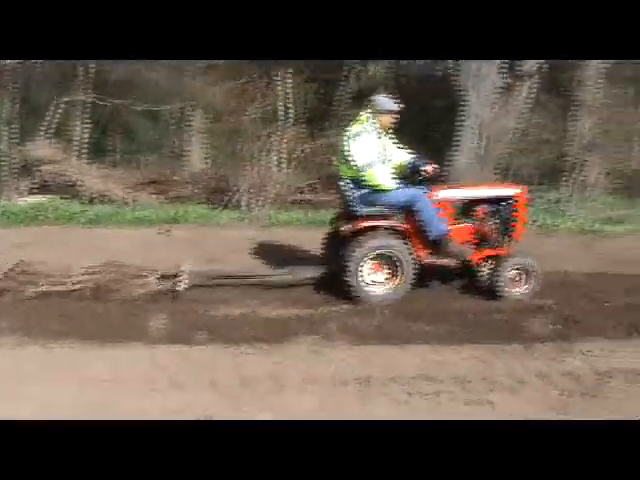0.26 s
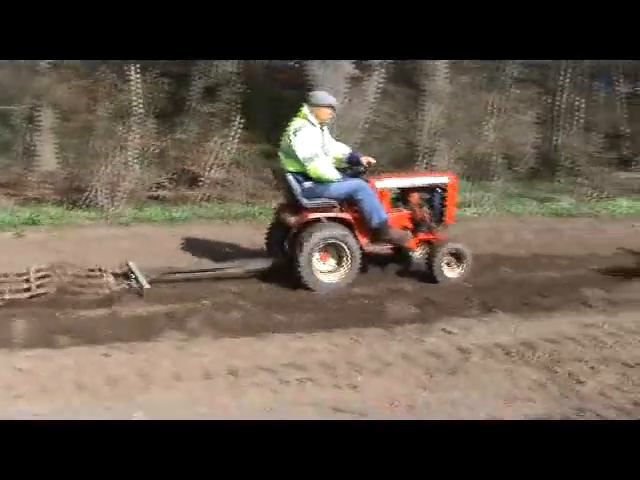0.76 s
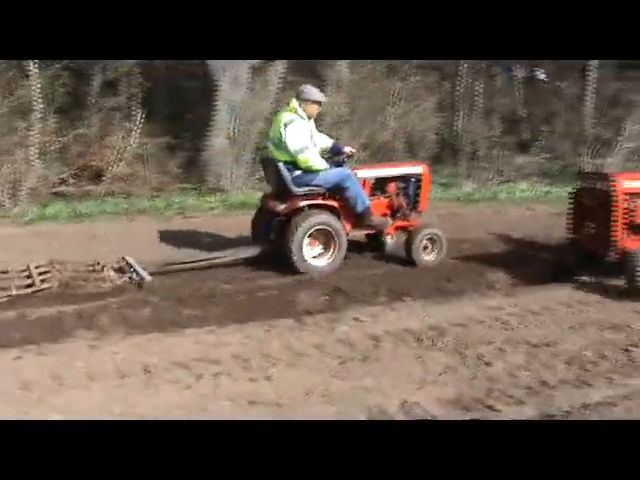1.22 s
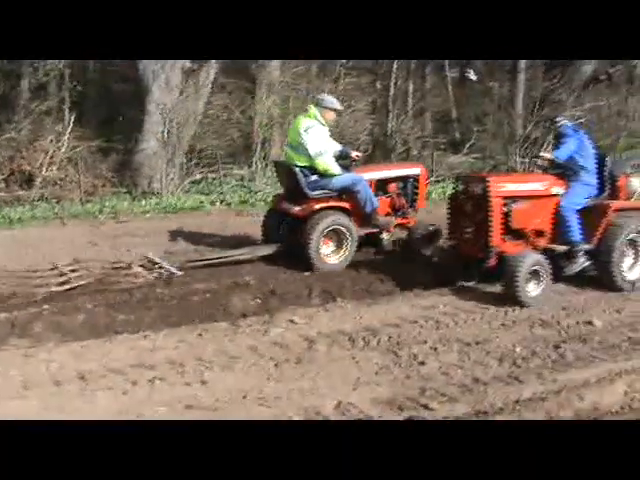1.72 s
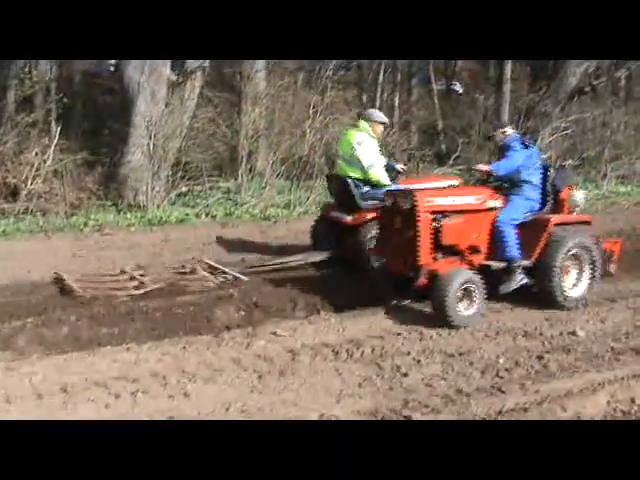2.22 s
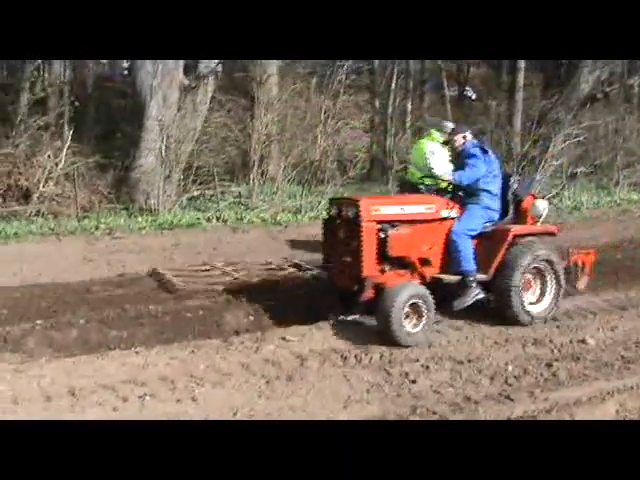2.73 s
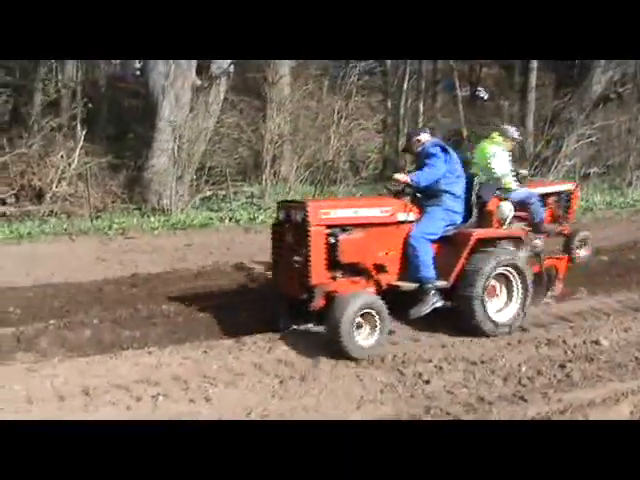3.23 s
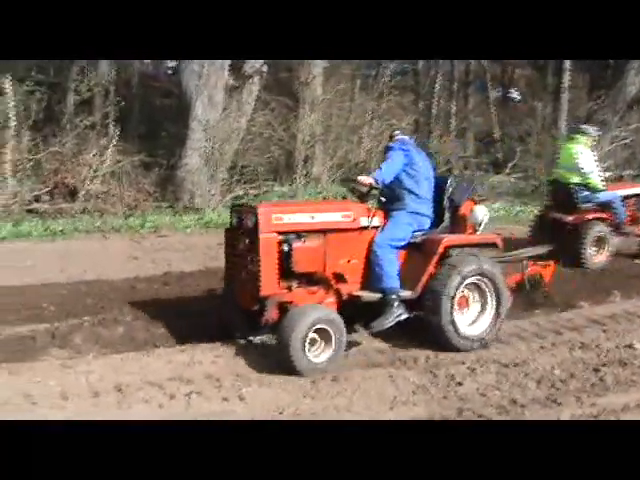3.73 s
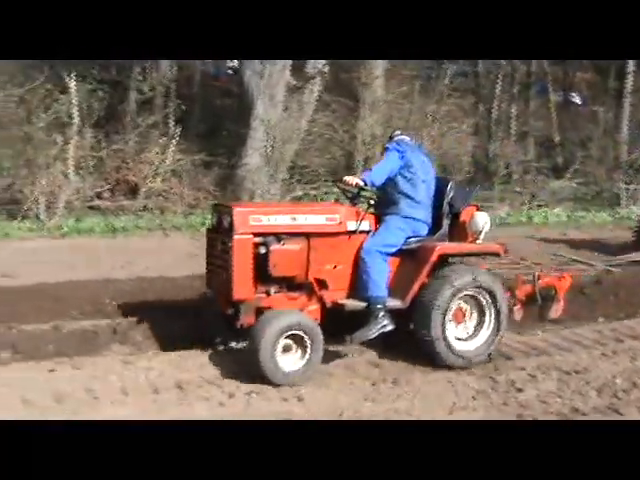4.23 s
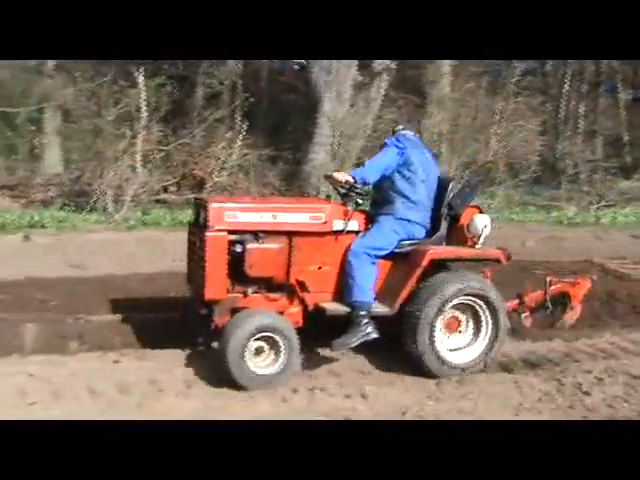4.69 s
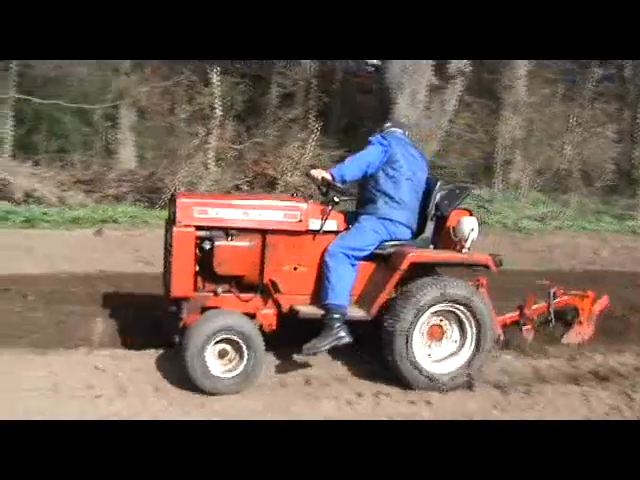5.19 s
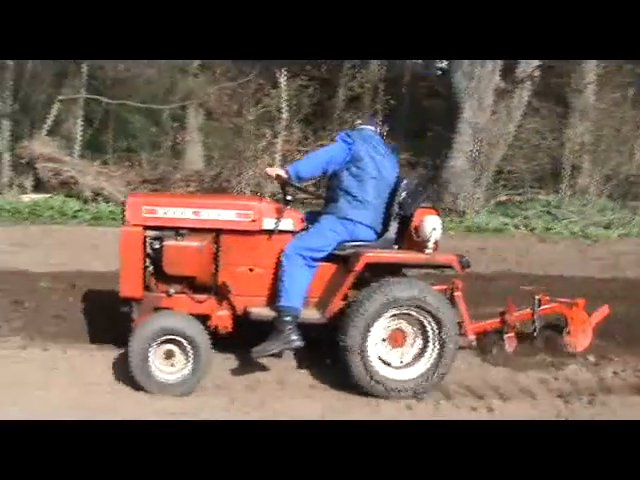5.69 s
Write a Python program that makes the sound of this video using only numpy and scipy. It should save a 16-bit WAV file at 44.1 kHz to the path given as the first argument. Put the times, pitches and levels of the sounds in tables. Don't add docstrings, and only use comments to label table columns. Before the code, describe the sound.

Loud low wind blasts open the scene and die away after about a second, uncovering two overlapping tractor engines with fast, even beats. A soft chuffing single-cylinder passes and recedes, dragging a faintly clinking harrow. A two-cylinder with uneven, hissing exhaust pops draws near and dominates from three seconds. Sheet metal rattles throughout; dry open-air stereo, slightly left, with wind rumble on the microphone.

```python
import sys
import numpy as np
from scipy import signal
from scipy.fft import rfft, irfft
from scipy.io import wavfile
from scipy.ndimage import uniform_filter1d

SR = 44100
rng = np.random.default_rng(int(sys.argv[2]) if len(sys.argv) > 2 else 0)


def boost_factor(decibels):
    exponent = np.asarray(decibels, float) / 20
    return 10 ** exponent


def transcribe(u):
    v = np.clip(np.atleast_2d(u).T, -1, 1)
    q = np.round(v * 32767).astype(np.int16)
    wavfile.write(sys.argv[1], SR, q)


N = 262395
HZ = np.arange(N // 2 + 1) * SR / N + 1e-3

# time_s, nearness_db
TWIN_PATH = [(0, -6.5), (1, -6.5), (1.5, -4), (2.4, -3), (2.75, -3.5), (2.97, -1.5), (3.25, -1.5),
             (3.6, -0.85), (4.5, 0.16), (5.4, 1.17), (5.95, 0.6)]
# time_s, nearness_db, screened_db
SINGLE_PATH = [
    (0, 1, 0.5),
    (1.3, 0.5, -2.5),
    (2.0, -1.5, 0),
    (2.7, -0.5, -14),
    (3.6, -3.5, 3.5),
    (5.95, -2.5, -9.5),
]
# time_s, extra_pop_db
RICH_FIRINGS = [
    (.39, -1),
    (2.84, -3.5),
    (3.0, 4),
    (4.38, 3),
    (4.79, -1.5),
    (5.03, -2),
    (5.36, -1.5),
    (5.44, 2.5),
    (5.52, -0.5),
    (5.685, 2.5),
]
# pitch_hz, width_hz, signed_share
TWIN_PIPE = [(76, 40, .75), (105, 51, 1.0), (192, 60, .55)]
SINGLE_PIPE = [(88, 88, .35), (130, 56, -1.0), (196, 60, .6), (245, 60, -.2)]
# pitch_hz, width_hz, level_db
POP_BANDS = [(950, 1160, -6), (1917, 87, 8.5), (3110, 1700, 11), (4880, 600, 8), (5570, 640, 5),
             (8300, 1470, 6), (9820, 1730, 5), (12600, 4500, -7), (14900, 2900, -31)]
CHUFF_BANDS = [(717, 360, -1), (1340, 660, -6), (2040, 220, -4.5), (3130, 650, -5.5), (5640, 2100, -9)]
# pitch_hz, width_hz, level_db
PANELS = [(740, 67, 4.5), (1003, 63, 4), (1483, 210, 4), (1980, 98, 1), (3170, 170, 1.5), (4480, 970, 3)]
# pitch_hz, level_db
CLATTER_COLOUR = [(40, -19), (120, 11), (250, -25), (380, -11), (600, -2.5), (1200, -8), (2500, -12),
                  (3700, -14), (4300, -22.5), (6400, -23.5), (7500, -29.5), (11000, -33), (12500, -39.5),
                  (15500, -57)]
# pitch_hz, t60_s
LINKS = [(6438, .06), (6926, .1), (9146, .1), (11561, .12)]
LINK_REST_DB = [-75, -76, -77.5, -80.5]
# middle_s, half_length_s, link_hz, above_rest_db
SHAKES = [(.7, .55, 11561, 7), (.9, .45, 6438, 6), (.8, .55, 9146, 6), (1.5, .2, 6926, 4),
          (1.9, .25, 11561, 8.5), (1.85, .3, 9146, 8.5), (4.3, .9, 11561, 7), (3.9, .75, 6926, 8),
          (3.9, .4, 9146, 5), (4.8, .5, 6438, 4), (5.4, .6, 9146, 10), (5.8, .2, 6438, 6),
          (5.7, .25, 11561, 6)]
# start_s, hold_s, buffet_db, extra_rumble_db
GUSTS = [(0, .2, -12, -16), (0.223, 0.29, -12.5, -10), (0.546, .15, -12.5, -17), (0.723, 0.048, -16.5, 1),
         (.895, .012, -27.5, 11.5), (1.164, 0.025, -33, .1), (1.278, 0.064, -35.5, 2),
         (2.135, 0.026, -40, 11), (2.274, 0.033, -36.5, 7), (2.418, 0.029, -34.5, 3), (2.8, 0.036, -39, 7),
         (3.238, 0.27, -33, 2), (3.905, 0.24, -35, 8), (4.378, 0.017, -29, -1), (4.539, 0.019, -26, 8),
         (4.712, .25, -22, 9), (5.136, 0.021, -28, -11), (5.912, .06, -20, 2)]
# time_s, level_db
BREEZE = [(0, -30), (.8, -31), (.86, -38), (1.05, -42), (1.6, -47), (2.05, -47), (2.55, -38), (3.1, -43),
          (3.8, -43), (4.1, -34), (4.68, -32), (5.3, -27), (5.37, -38), (5.42, -31), (5.78, -25.5),
          (5.9, -28)]
# pitch_hz, level_db
BUFFET_MID = [(15, -50), (30, -18), (55, -15), (90, 0.5), (175, 2), (300, -5), (525, -19.5), (800, -32),
              (1500, -43), (3000, -70), (5500, -120)]
BUFFET_SIDE = [(15, -45), (25, -15), (58, -12), (124, -5), (156, -1), (243, 0), (433, -5), (757, -16),
               (1460, -32), (2500, -42), (3250, -72), (5500, -120)]
# pitch_hz, level_db
RUMBLE = [(15, -28), (30, -10), (65, 0), (110, -5), (200, -18), (500, -45), (3000, -120)]

# firings at 0 s, firings per s, sag of that rate per s
TWIN_SPEED, SINGLE_SPEED = (.375, 24.567, 0), (-.86, 19.383, .0316)
TWIN_THUMP_DB, SINGLE_THUMP_DB = -37.7, -41.2
POP_DB, CHUFF_DB = -46, -49
TWIN_TIN_DB, SINGLE_TIN_DB = (-41.5, -47.5), (-47.5, -45.5)
TWIN_PAN_DB, SINGLE_PAN_DB = -2.5, -5
POP_BEAM, TIN_BEAM = 1.9, (1.6, 2.5)
WEAK_DB, WEAK_DROPS = -7.5, 1.5
GUST_RISE_DB_S, GUST_FALL_DB_S = 800, 380
DULL_HZ, DULL_SLOPE = 226, 0.19
EVENING = .6
RUMBLE_DB, RUMBLE_SLOPE = -8, -.42
WIND_PAN_DB, WIND_PAN_SLOPE = -1.5, -0.31


def twin(near_db):
    crank = crank_turns(*TWIN_SPEED)
    at, number = strokes(crank, shift=-.135, jitter=.0003)
    weak = number % 2
    strength_db = .9 * rng.standard_normal(200)[:len(at)]
    pulse = clicks(at, strength_db)
    sharp = clicks(at, -200 * weak) * pulse
    blunt = 1.15 * soften(np.roll(pulse - sharp, -10), .0008)
    gulp_at, _ = strokes(crank, shift=.356, jitter=.0006)
    low = thump(sharp + blunt - clicks(gulp_at, -13), TWIN_PIPE)

    pop_at = np.minimum(at + int(.0036 * SR), N - 1)
    rich_db = sum(db * (abs(pop_at / SR - s) < .018) for s, db in RICH_FIRINGS)
    weak_db = np.minimum(WEAK_DB - WEAK_DROPS * near_db, 0)
    level_db = strength_db + rich_db + weak * weak_db[at]
    pops = jet(pop_at, level_db, POP_BANDS, seconds=.0021, colour_db=2.2)
    valve_at = np.minimum(gulp_at + 200, N - 1)
    valve = boost_factor(-11) * jet(valve_at, 0, POP_BANDS, seconds=.004, colour_db=4)
    return boost_factor(TWIN_THUMP_DB + near_db) * low, boost_factor(POP_DB + POP_BEAM * near_db) * (pops + valve)


def single(far_db, screened_db):
    at, _ = strokes(crank_turns(*SINGLE_SPEED), shift=-.169, jitter=.0003)
    strength_db = 1.1 * rng.standard_normal(200)[:len(at)]
    pulse = clicks(at, strength_db)
    pulse = pulse - .56 * np.roll(pulse, int(.0148 * SR))
    chuff_at = np.minimum(at + int(.0055 * SR), N - 1)
    chuff = jet(chuff_at, strength_db, CHUFF_BANDS, seconds=.0033, colour_db=1.4)
    chuff_db = CHUFF_DB + 0.55 * far_db + 0.25 * screened_db
    return boost_factor(SINGLE_THUMP_DB + far_db) * thump(pulse, SINGLE_PIPE), boost_factor(chuff_db) * chuff


def crank_turns(start, rate, sag):
    t = np.arange(N) / SR
    return start + rate * t - sag * t ** 2 / 2


def strokes(crank, shift, jitter):
    late = crank - shift
    at = np.flatnonzero(np.diff(np.floor(late)) > 0)
    wobble = (jitter * SR * rng.standard_normal(200)[:len(at)]).astype(int)
    return np.clip(at + wobble, 0, N - 1), np.floor(late[at + 1]).astype(int)


def clicks(at, level_db):
    out = np.zeros(N)
    out[at] = boost_factor(level_db)
    return out


def thump(train, pipe):
    modes = []
    for hz, width, share in pipe:
        modes.append(share * resonance(resonance(train, hz, width), hz, width))
    return unit(sum(modes))


def jet(at, level_db, bands, seconds, colour_db):
    spread = rng.standard_normal((200, len(bands)))[:len(at)]
    white = rng.standard_normal((2, N))
    out = 0
    for k, (hz, width, db) in enumerate(bands):
        puffs = clicks(at, level_db + db + colour_db * spread[:, k])
        gate = soften(puffs, seconds, rise=.9)
        pole_width = width * 1.57
        hiss = resonance(resonance(white[k % 2], hz, pole_width), hz, pole_width)
        out = out + gate * unit(hiss)
    return unit(out)


def clatter(low_db, high_db):
    noise = coloured(rng.standard_normal(N), CLATTER_COLOUR)
    noise = noise + sum((boost_factor(db) - 1) * resonance(noise, hz, width) for hz, width, db in PANELS)
    low = signal.lfilter(*signal.butter(1, 2500, fs=SR), noise)
    shared = drift(44)
    low_flicker_db = 0.56 * shared + 0.4 * drift(35)
    high_flicker_db = 1.53 * shared + 0.14 * drift(57)
    return boost_factor(low_db + low_flicker_db) * unit(low) + boost_factor(high_db + high_flicker_db) * unit(noise - low)


def harrow():
    levels_db = [jingle_db(hz, db) for (hz, _), db in zip(LINKS, LINK_REST_DB)]
    sizes = LINKS + [(10363, .06)]
    levels_db = levels_db + [levels_db[2] - 4]
    out = 0
    for (hz, t60), level_db in zip(sizes, levels_db):
        knocks = rng.random(N) < 130 / SR
        hits = knocks * boost_factor(2.0 * np.minimum(rng.exponential(1, N), 4))
        out = out + boost_factor(1.2 * level_db + 17 + hz / 6000) * unit(resonance(hits, hz, 2.2 / t60))
    return out


def jingle_db(link_hz, rest_db):
    t = np.arange(N) / SR
    level_db = rest_db
    for middle, half, hz, db in SHAKES:
        if abs(hz / link_hz - 1) < 1 / 20:
            level_db = level_db + db * np.clip(2 - 2 * abs(t - middle) / (1.15 * half), 0, 1)
    return level_db


def wind():
    buffet_db, pan_db, rumble_db = gusts()
    eddies, other, slow = rng.standard_normal((3, N))
    alike = .6
    side = alike * coloured(eddies, BUFFET_SIDE, 1j)
    side = side + np.sqrt(1 - alike ** 2) * coloured(other, BUFFET_SIDE)
    side = side + boost_factor(rumble_db - 7) * coloured(other, RUMBLE)
    body_db = -.8 + .14 * (buffet_db + 20)
    mid = boost_factor(body_db) * coloured(eddies, BUFFET_MID)
    mid = mid + boost_factor(rumble_db) * coloured(slow + 0.57 * eddies, RUMBLE)
    ports = mid + side * [[1], [-1]]

    dull = signal.sosfilt(signal.butter(2, DULL_HZ, fs=SR, output="sos"), ports)
    ports = dull + boost_factor(np.minimum(DULL_SLOPE * (buffet_db + 21), 0)) * (ports - dull)
    power = np.mean(ports ** 2, axis=0)
    lumps = uniform_filter1d(power, size=900) / uniform_filter1d(power, size=9000)
    ports = ports / (lumps + 0.047) ** (EVENING / 2)
    ports = ports + .08 * signal.sosfilt(signal.butter(2, 90, "high", fs=SR, output="sos"), ports ** 2)
    return ports * boost_factor(buffet_db - 5.0 + 1.65 * drift(24) + pan_db * [[.5], [-.5]])


def gusts():
    t = np.arange(N) / SR
    breeze_db, = in_time(BREEZE)
    powers = []
    for s, hold, db, _ in GUSTS:
        corners_s = [s - 1, s, s + hold, s + hold + 1]
        corners_db = [db - GUST_RISE_DB_S, db, db, db - GUST_FALL_DB_S]
        powers.append(boost_factor(2 * np.interp(t, corners_s, corners_db)))
    total = sum(powers) + boost_factor(2 * breeze_db)
    above_db = 10 * np.log10(total) + 20
    extra_db = sum(row[3] * power for row, power in zip(GUSTS, powers)) / total
    pan_db = WIND_PAN_DB + WIND_PAN_SLOPE * above_db
    return above_db - 20, pan_db, RUMBLE_DB + RUMBLE_SLOPE * above_db + extra_db


def resonance(x, hz, width_hz):
    r = np.exp(-np.pi * width_hz / SR)
    poles = [1, -2 * r * np.cos(2 * np.pi * hz / SR), r * r]
    return signal.lfilter([(1 - r * r) / 2, 0, (r * r - 1) / 2], poles, x + 1e-18)


def soften(x, seconds, rise=1):
    r, q = np.exp(-1 / (seconds * SR)), np.exp(-1 / (rise * seconds * SR))
    return signal.lfilter([(1 - r) * (1 - q)], [1, -r - q, r * q], x + 1e-18)


def coloured(white, points, turn=1):
    hz, level_db = np.transpose(points)
    gain_db = np.interp(np.log(HZ), np.log(hz), level_db)
    return unit(irfft(rfft(white) * boost_factor(gain_db) * turn, N))


def drift(rate):
    return unit(soften(rng.standard_normal(N + SR), 1 / (2 * np.pi * rate))[SR:])


def unit(x):
    return x / np.sqrt(np.mean(x ** 2) + 1e-20)


def in_time(rows):
    s, *columns = np.transpose(rows)
    return [np.interp(np.arange(N) / SR, s, c) for c in columns]


def power_sum(levels_db):
    return 10 * np.log10(sum(boost_factor(2 * db) for db in levels_db))


def scene():
    near_db, = in_time(TWIN_PATH)
    far_db, screened_db = in_time(SINGLE_PATH)
    single_low_db = SINGLE_TIN_DB[0] + far_db
    single_high_db = SINGLE_TIN_DB[1] + far_db + screened_db
    low_db = power_sum([single_low_db, TWIN_TIN_DB[0] + TIN_BEAM[0] * near_db])
    high_db = power_sum([single_high_db, TWIN_TIN_DB[1] + TIN_BEAM[1] * near_db])
    single_share = boost_factor(2 * (single_low_db - low_db))
    pan_db = TWIN_PAN_DB + single_share * (SINGLE_PAN_DB - TWIN_PAN_DB)

    twin_thump, pops = twin(near_db)
    single_thump, chuff = single(far_db, screened_db)
    bright = pops + chuff + clatter(low_db, high_db) + harrow()
    echo = np.roll(pops + chuff, int(0.0063 * SR))
    scattered = boost_factor(-15.0) * (clatter(low_db, high_db) + echo)
    wide = (bright + scattered * [[1], [-1]]) * boost_factor(pan_db * [[.5], [-.5]])
    return twin_thump + single_thump + wide + wind()


def roll_off(x):
    return signal.sosfilt(signal.butter(12, 15880, fs=SR, output="sos"), x)


def record(dry):
    mix = 1.1 * np.tanh(dry / 1.1)
    return roll_off(mix)


dry = scene()
out = record(dry)
transcribe(out)
```